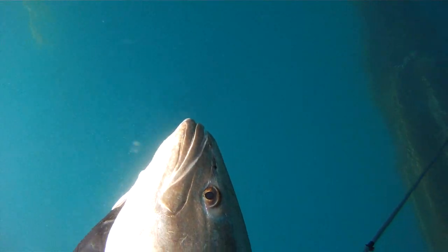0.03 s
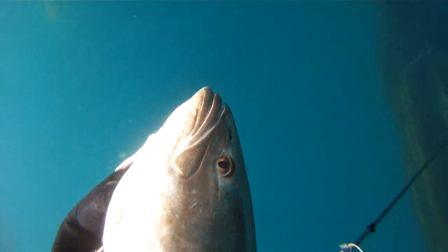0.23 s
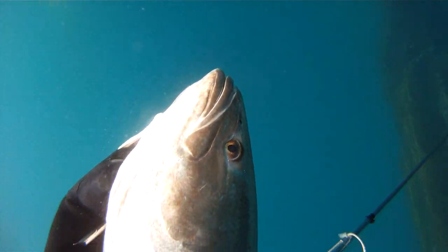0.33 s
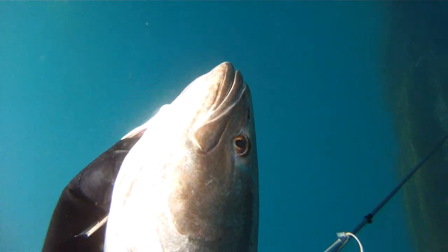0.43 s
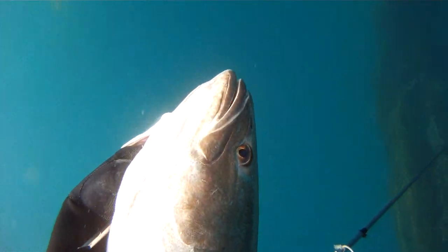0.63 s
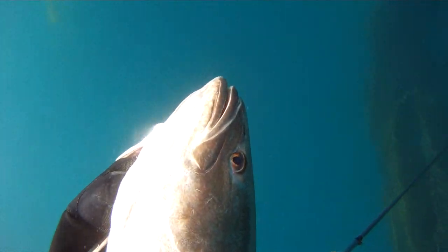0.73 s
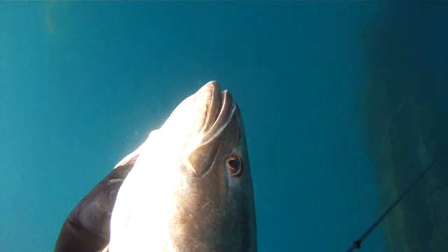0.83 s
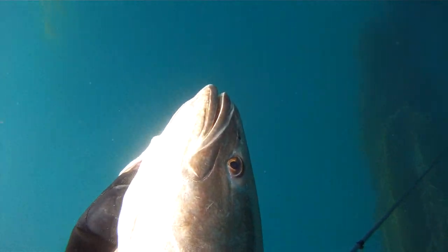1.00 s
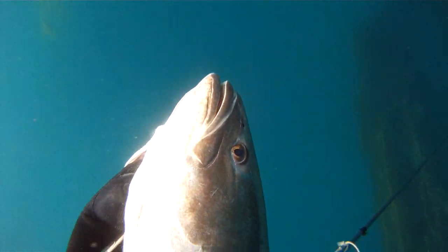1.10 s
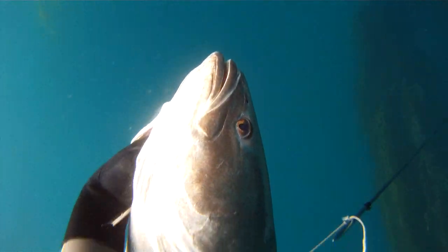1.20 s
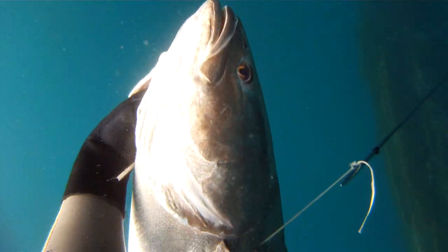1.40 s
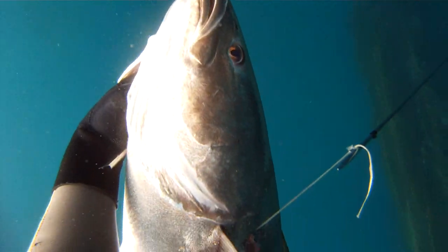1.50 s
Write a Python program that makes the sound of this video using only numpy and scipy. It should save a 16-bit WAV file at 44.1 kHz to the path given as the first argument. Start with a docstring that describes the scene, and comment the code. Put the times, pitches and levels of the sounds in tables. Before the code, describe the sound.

Close by underwater, a fish gives one loud croak of rapid, low drumming pulses. Around it, moving water rumbles softly and small sharp clicks, probably shrimp, snap over a faint crackle. Two tiny bubbles blip near the end.

```python
"""A rumble of moving water and a sharp click come first; then a fish held under water croaks once.
Its drumming muscle twitches and knocks the swim bladder, a heavily damped resonator, ten times.
Clicks, probably snapping shrimp, excite the modes of the camera housing over a faint crackle,
and two small bubbles ring near the end. The recorder overloads on the loudest knock
and mirrors every sound faintly around 12 kHz."""
import sys
import numpy as np
from scipy import signal
from scipy.fft import rfft, irfft
from scipy.io import wavfile

SR = 44100
rng = np.random.default_rng(int(sys.argv[2]) if len(sys.argv) > 2 else 0)


def store_pcm(level_fs):
    """Save levels as 16-bit WAV."""
    pcm = np.round(np.clip(level_fs, -1, 1) * 32767).astype(np.int16)
    wavfile.write(sys.argv[1], SR, np.atleast_2d(pcm).T)


N = 68355
TIME = np.arange(N) / SR


def amp(db):
    """The decibel scale: 20 dB is a factor of ten in amplitude."""
    return 10 ** (np.asarray(db) / 20)


def colour(x, curve):
    """Linear filtering: the spectrum is multiplied by a curve (frequency [Hz], gain [dB])."""
    hz, db = np.transpose(curve)
    bins_hz = np.fft.rfftfreq(2 * N, 1 / SR)
    gain = amp(np.interp(np.log(bins_hz + 1), np.log(hz), db))
    return irfft(rfft(x, 2 * N) * gain)[:N]


def noise(spectrum):
    """Spectral shaping: white noise is filtered, then scaled to an rms of one."""
    x = colour(rng.standard_normal(N), spectrum)
    return x / np.sqrt(np.mean(x ** 2) + 1e-20)


def add(mix, start, sound):
    """Superposition: a sound sums into the mix from its start [s]."""
    part = mix[max(round(start * SR), 0):][:len(sound)]
    part += sound[:len(part)]


def pulse(t, width_s):
    """A Gaussian pulse: the narrower it is, the wider its spectrum."""
    return np.exp(-.5 * (t / width_s) ** 2)


def scatter(x, delay_s, t60_s):
    """Reverberation: reflections from the surface and nearby rock decay exponentially."""
    t = np.arange(SR // 4) / SR
    decay = (t > delay_s) * 1000 ** (-np.maximum(t - delay_s, 0) / t60_s)
    reflections = rng.standard_normal(len(t)) * decay
    return signal.fftconvolve(x, reflections / np.linalg.norm(reflections))[:N]


# Spectrum of the hiss that differs between channels (frequency [Hz], relative level [dB])
SIDE_SPECTRUM = [(20, 5.5), (100, -5.5), (1000, -7.5), (4000, -11.5), (10000, -24.5), (16000, -26)]
def side_hiss():
    """Decorrelation: faint independent noise gives a little stereo width."""
    return amp(-72.5) * noise(SIDE_SPECTRUM)


# Spectrum of still water (frequency [Hz], relative level [dB])
WATER_SPECTRUM = [(10, -6.5), (30, 3.5), (48, 0.5), (70, -10), (110, -15), (200, -20), (400, -26.5),
                  (700, -28.5), (1000, -35), (1700, -37.5), (2100, -31), (2600, -35), (4200, -36),
                  (5500, -44), (7500, -49), (16000, -78)]
# Swell of the rumble (time [s], gain [dB])
RUMBLE_SWELL = [(0, 1), (.6, 2.5), (1.0, -3.5), (1.35, 2.5), (1.46, 2.5), (1.55, 4.5)]
def water():
    """Flow noise: under a steady hiss, the rumble swells as water moves past the camera."""
    wash = amp(-42.5) * noise(WATER_SPECTRUM)
    rumble = signal.sosfiltfilt(signal.butter(2, 700, fs=SR, output="sos"), wash)
    swell = amp(np.interp(TIME, *np.transpose(RUMBLE_SWELL)))
    return wash + rumble * (swell - 1)


# Bubbles (time [s], frequency [Hz], level [dB], 60 dB decay time [s])
BUBBLES = [(1.265, 760, -40.5, 0.023), (1.455, 687, -44.5, 0.11)]
def bubbles():
    """Bubble resonance: each small bubble rings as a damped sinusoid."""
    t, out = np.arange(SR // 5) / SR, np.zeros(N)
    for start, hz, db, t60 in BUBBLES:
        add(out, start, amp(db) * np.sin(2 * np.pi * hz * t) * 1000 ** (-t / t60))
    return out


# Housing modes (frequency [Hz], relative level [dB], 60 dB decay time [s])
HOUSING_MODES = [(1373, -1.5, 0.0062), (2124, -0.5, .013), (2752, -3.5, 0.007), (3980, -0.5, 0.0043),
                 (4860, -10.5, 0.0029)]
# Low, middle and high bands of a click (frequency [Hz])
BAND_HZ = [2110, 2700, 4000]
def housing(band_db):
    """Modal ringing: a click excites the camera housing's modes, each detuned at random."""
    t = np.arange(SR // 40) / SR
    out = np.zeros(len(t))
    for hz, db, t60 in HOUSING_MODES:
        detuned_hz = hz * (1 + 0.025 * rng.standard_normal())
        mode = np.sin(2 * np.pi * detuned_hz * t) * 1000 ** (-t / t60)
        out += amp(db + np.interp(hz, BAND_HZ, band_db)) * mode / np.linalg.norm(mode)
    return out


def crackle(clicks_per_s=150):
    """A Poisson process: far clicks arrive independently, random in size and colour."""
    out = np.zeros(N)
    starts = np.cumsum(rng.exponential(1 / clicks_per_s, 500))
    for start in starts[starts < N / SR]:
        size_db = -49 + 5 * min(rng.exponential(), 3)
        add(out, start, housing(rng.normal(size_db, 3, len(BAND_HZ))))
    return out


# Near clicks (time [s], relative level of the low band [dB], middle band [dB], high band [dB])
NEAR_CLICKS = [(0.1181, -15.5, -19, -22), (0.1681, -50, -49, -28.5), (0.1827, -19, -25, -43),
               (0.2156, -18.5, -31, -42), (0.4643, -22, -24.5, -25.5), (0.5866, -31, -33, -36),
               (0.642, -31, -40, -41), (0.675, -26.5, -26, -25.5), (0.6905, -32, -29, -23.5),
               (0.7572, -7.5, -13, -8), (0.8107, -27.5, -21.5, -25.5), (0.8755, -5.5, -10.5, -38),
               (0.9492, -20.5, -33, -22.5), (1.0342, -20, -20.5, -24.5), (1.2499, -26, -25, -22.5),
               (1.3039, -23.5, -34, -32), (1.3507, -23, -32, -25), (1.3801, -38, -28, -20.5),
               (1.4057, -12.5, -31, -27), (1.4422, -26, -38, -25)]
# Passband of all clicks (frequency [Hz], gain [dB])
CLICK_PASSBAND = [(100, -31.5), (700, -27.5), (1300, -16.5), (2000, 0.5), (5000, -0.5), (6000, -9.5),
                  (7500, -30), (12000, -56.5)]
def clicks():
    """Multipath propagation: near clicks arrive directly, then as echoes, over the far crackle."""
    direct = np.zeros(N)
    for start, *band_db in NEAR_CLICKS:
        add(direct, start, housing(band_db))
    tail = amp(-8.5) * scatter(direct, delay_s=0.0016, t60_s=0.079)
    echo = amp(-14.5) * scatter(direct, delay_s=0.016, t60_s=0.067)
    return colour(direct + tail + echo + crackle(), CLICK_PASSBAND)


# Muscle twitches (time [s], level [dB])
TWITCHES = [(0.2499, -5), (0.2814, -5.5), (0.3115, -11), (0.3406, -5.5), (0.3675, -16.5), (0.3968, -16.5),
            (0.4237, -10.5), (0.4524, -13), (0.466, -18.5), (0.497, -6.5), (0.5287, -11)]
def drumming_muscle(hz=71, width_s=0.0038):
    """Forced motion: each twitch gives one slow swing of pressure."""
    out = np.zeros(N)
    for centre, db in TWITCHES:
        t = TIME - centre
        out += amp(db) * np.sin(2 * np.pi * hz * t) / np.cosh(np.clip(t / width_s, -20, 20))
    return out


# Knocks (time [s], ring level [dB], ring frequency [Hz], snap level [dB], snap frequency [Hz])
KNOCKS = [(0.2169, -6, 143, -26.5, 440), (0.2501, -8.5, 144.7, -16.5, 395), (.278, -6.5, 155, -12, 432),
          (0.3092, -9, 154.5, -15.5, 440), (0.3363, -3, 150.5, -11, 358), (.3631, -6, 144, -20, 366),
          (0.391, -5, 144.6, -23, 367), (.4192, -4.5, 146, -23, 355), (0.4626, -4.5, 145.4, -22.5, 379),
          (.4961, -3, 141.4, -19.5, 400)]
# Spectrum of a hard knock's gritty edge (frequency [Hz], relative level [dB])
RASP_SPECTRUM = [(300, -2), (900, 3.5), (1500, -0.5), (2500, -9.5), (5000, -13.5), (6200, -28), (9000, -67)]
def swim_bladder(lead_s=0.0008, rise_s=0.0057):
    """Damped resonance: each knock snaps, then swings the bladder briefly; hard knocks rasp."""
    out, grit = np.zeros(N), np.zeros(N)
    for onset, ring_db, ring_hz, snap_db, snap_hz in KNOCKS:
        t = TIME - onset
        age = np.maximum(t + lead_s, 0) / rise_s
        ring = (age * np.exp(1 - age)) ** 2.78 * np.cos(2 * np.pi * ring_hz * t)
        push = 0.55 * pulse(t, width_s=0.00082)
        snap = pulse(t, width_s=0.001) * np.cos(2 * np.pi * snap_hz * t)
        out += amp(ring_db) * (ring + push) + amp(snap_db) * snap
        grit += amp(ring_db + snap_db / 2) ** 2 * pulse(t - 0.0033, width_s=0.0019)
    return out + amp(-35.5) * grit / grit.max() * noise(RASP_SPECTRUM)


def scene():
    """Mid-side stereo: all sources sum in the centre, and only a faint hiss differs."""
    croak = drumming_muscle() + swim_bladder()
    background = water() + bubbles()
    croak_tail = amp(-16) * scatter(croak, delay_s=0.0078, t60_s=0.13)
    mid = background + clicks() + croak + croak_tail
    side = side_hiss()
    return np.array([mid + side, mid - side])


def record(dry, mirror_hz=12000, cutoff_hz=15700):
    """Clipping and modulation: the clipped wave's slope puts mirror sidebands around a carrier."""
    clipped = np.clip(dry, -1, 1)
    slope = SR * np.gradient(clipped, axis=1)
    carrier = np.sin(2 * np.pi * mirror_hz * TIME)
    mirror = amp(3) * slope / (np.pi * mirror_hz) * carrier
    lowpass = signal.firwin(101, cutoff_hz, window=("kaiser", 9), fs=SR)
    return signal.oaconvolve(clipped + mirror, lowpass[None], "same")


dry = scene()
out = record(dry)
store_pcm(out)
```